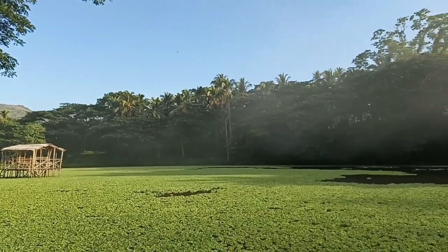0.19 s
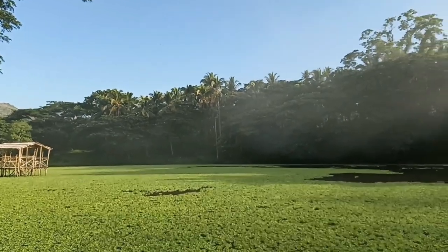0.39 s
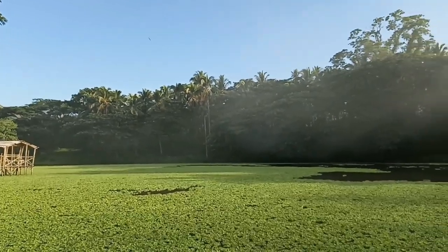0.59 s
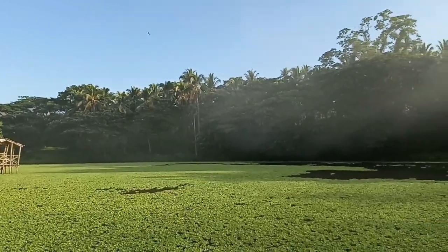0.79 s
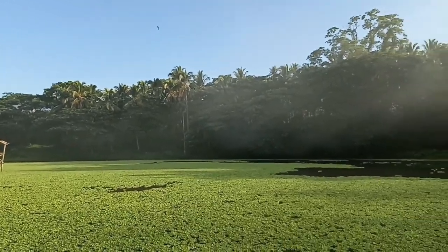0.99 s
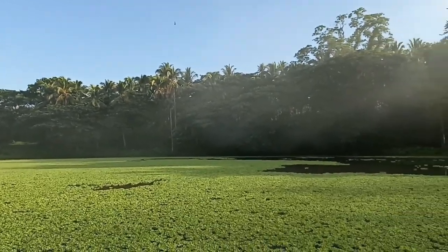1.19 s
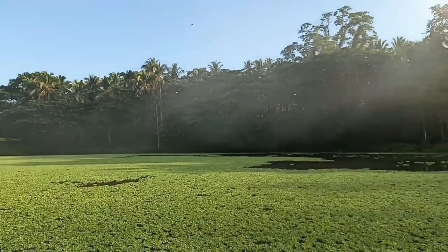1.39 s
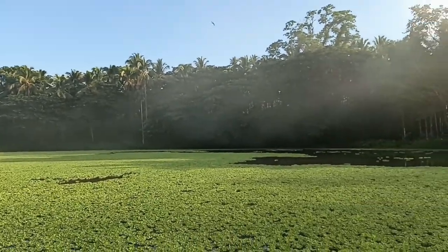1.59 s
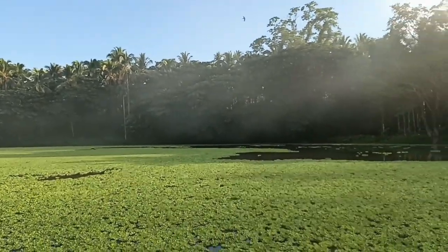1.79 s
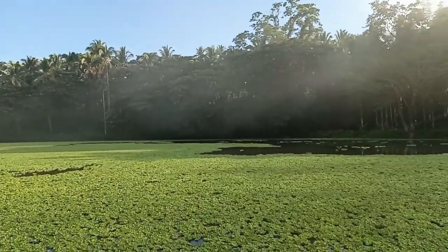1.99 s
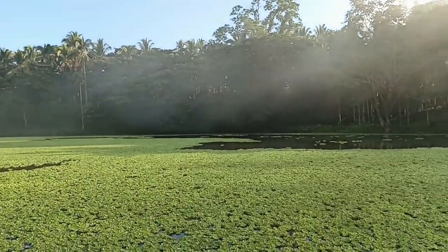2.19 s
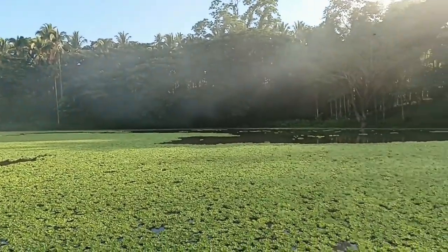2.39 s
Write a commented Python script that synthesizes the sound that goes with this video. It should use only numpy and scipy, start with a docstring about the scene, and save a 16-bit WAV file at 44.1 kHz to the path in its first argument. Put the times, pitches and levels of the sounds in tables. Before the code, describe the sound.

One sharp wooden knock echoes off trees across a pond while small birds chirp and whistle

```python
"""By a pond ringed with forest, in the morning: a few faint taps and one sharp wooden knock sound
across the water, and the trees throw the knock back. Knocks are bursts of noise plus ringing wood tones.
Small birds whistle, chirp and tick near and far, and a distant chicken calls: gliding tones with echoes.
Insects hiss, buzz and trill, made from narrow noise and a wavering tone, over shaped noise
for the far hiss, a wash and a low, uneven rumble of air."""
import sys
import numpy as np
from scipy import signal
from scipy.fft import rfft, irfft
from scipy.io import wavfile
from scipy.ndimage import uniform_filter1d, map_coordinates

SR = 44100
rng = np.random.default_rng(int(sys.argv[2]) if len(sys.argv) > 2 else 0)


def dump_mix(stems):
    """Bounce the given channels to the path in sys.argv[1] as a 16-bit WAV at rate SR."""
    frames = np.atleast_2d(stems).T  # one column per channel
    limited = np.clip(frames, -1, 1)  # hard clip at full scale
    pcm = np.round(limited * 32767).astype(np.int16)
    wavfile.write(sys.argv[1], SR, pcm)


N = 105840  # length of the scene in samples


def amp(db):
    """Turns decibels into a gain."""
    return 10 ** (np.asarray(db) / 20)


def evened(x):
    """Scales a sound to an average (rms) strength of one."""
    return x / np.sqrt(np.mean(x ** 2) + 1e-20)


def read(points, hz):
    """Reads a table between its points, with pitch on a logarithmic scale."""
    table_hz, value = np.transpose(points)
    return np.interp(np.log(hz + 1), np.log(table_hz + 1), value)


def level(points):
    """Gain at every sample, from a table of (time [s], level [dB])."""
    times, db = np.transpose(points)
    return amp(np.interp(np.arange(N) / SR, times, db))


def add(mix, s, sound):
    """Mixes a sound in, starting at time s in seconds."""
    part = mix[max(round(s * SR), 0):][:len(sound)]
    part += sound[:len(part)]


def noise(colour):
    """Steady noise whose balance of low and high follows a table."""
    spectrum = rfft(rng.standard_normal(N))
    gain = amp(read(colour, np.fft.rfftfreq(N, 1 / SR)))
    return evened(irfft(spectrum * gain, N))


def band(hz, width_hz):
    """Noise gathered in a narrow bell around one pitch."""
    f = np.fft.rfftfreq(N, 1 / SR)
    bell = np.exp(-.5 * ((f - hz) / width_hz) ** 2)
    return evened(irfft(rfft(rng.standard_normal(N)) * bell, N))


def drift(size, rate_hz):
    """A smooth random wander of about unit size, from curves through random points."""
    knots = rng.standard_normal(256)
    place = np.arange(size) * rate_hz / SR
    return map_coordinates(knots, [place], order=3, mode="mirror")


def scatter(x, t60, rise_s):
    """Echoes scattered by trunks and leaves: random reflections that fade by 60 dB in t60 seconds."""
    t = np.arange(SR) / SR
    taps = rng.standard_normal(SR) * (rng.random(SR) < 1500 / SR)  # about 1500 echoes per second
    tail = taps * (1 - np.exp(-t / rise_s)) * amp(-60 * t / t60)
    return signal.fftconvolve(x, tail / np.linalg.norm(tail))[:N]


NOTE_EDGE, WAVER, WAVER_HZ = 0.14, 0.0045, 79.4  # share of length, share of pitch, wander rate
FLUTTER_DB, FLUTTER_HZ = 2.8, 71  # most the loudness strays either way, wander rate


def note(length, pitches, overtone_db=-45, bend=0):
    """A nearly pure tone gliding through three pitches, wavering slightly in pitch and loudness."""
    u = np.linspace(0, 1, round(length * SR))
    glide = np.polyval(np.polyfit([0, .5, 1], pitches, 2), u)
    hz = glide * (1 + bend + WAVER * drift(len(u), WAVER_HZ))
    turn = 2 * np.pi * np.cumsum(hz) / SR
    edge = np.clip(np.minimum(u, 1 - u) / NOTE_EDGE, 0, 1)
    shape = np.sin(np.pi / 2 * edge) ** 2
    flutter = amp(FLUTTER_DB * np.tanh(drift(len(u), FLUTTER_HZ)))
    tone = np.sin(turn) + amp(overtone_db) * np.sin(2 * turn)
    return np.sqrt(2) * shape * flutter * tone


# colour of the far hiss: (pitch [Hz], relative level per Hz [dB])
AIR_COLOUR = [(100, -13), (200, -4), (400, -12), (800, -11), (1150, -30.5), (1400, -13.5), (1700, 1),
              (2100, -1), (2600, 1.5), (3200, -8), (4000, -19), (4900, -5.5), (5500, -21), (6400, -19.5),
              (9000, -21), (11000, -30.5), (15500, -33)]
AIR_DB = -65


def hiss():
    """The far hiss of the countryside: steady shaped noise."""
    return amp(AIR_DB) * noise(AIR_COLOUR)


# loudness of the mid-range wash as it swells and sinks: (time [s], level [dB])
WASH_LEVEL = [(0, -62.5), (0.12, -58.5), (0.3, -56.5), (0.5, -58), (0.7, -72), (0.9, -67), (2.4, -69)]
# colour of the wash: (pitch [Hz], relative level per Hz [dB])
WASH_COLOUR = [(150, -23.5), (400, -9), (800, -21.5), (1200, -2.5), (2000, -4.5), (3800, 3.5), (5200, -23),
               (9000, -47.5)]


def wash():
    """A mid-range wash: shaped noise that mostly dies away."""
    return level(WASH_LEVEL) * noise(WASH_COLOUR)


# uneven loudness of the rumble: (time [s], level [dB])
RUMBLE_LEVEL = [(0.0, -57.5), (0.13, -84.5), (0.35, -57.5), (0.39, -69), (0.51, -60.5), (0.56, -87),
                (0.61, -68), (0.85, -76), (1.15, -71), (1.18, -80), (1.54, -71), (1.64, -83.5),
                (1.76, -67.5), (1.82, -80.5), (2.0, -74.5), (2.03, -84), (2.18, -69), (2.4, -77)]
# colour of the rumble: (pitch [Hz], relative level per Hz [dB])
RUMBLE_COLOUR = [(20, -35), (45, -13.5), (80, -3), (115, 0.5), (160, -5.5), (230, -16.5), (400, -42.5),
                 (900, -48.5)]


def rumble():
    """A lumpy low rumble of air: deep noise whose level keeps rising and dipping."""
    return level(RUMBLE_LEVEL) * noise(RUMBLE_COLOUR)


# how strongly the far din flickers: (pitch [Hz], share of full flicker [0 to about 1])
FLICKER_SHARE = [(200, .3), (500, .9), (1500, 1), (3500, .9), (5000, .6), (7000, .3), (11000, .1)]
PATCH_DB, PATCH_S, PATCH_HZ = 3.2, .07, 170  # flicker strength; smoothing in time and pitch


def patchy(x):
    """Brief, narrow swells and gaps, as in a din of many far voices."""
    hz, at, z = signal.stft(x, SR, nperseg=1024, noverlap=768)
    field = rng.standard_normal(z.shape)
    for _ in range(2):
        field = uniform_filter1d(field, round(PATCH_S / at[1]), axis=1)
        field = uniform_filter1d(field, round(PATCH_HZ / hz[1]), axis=0)
    flicker_db = PATCH_DB * evened(field) * read(FLICKER_SHARE, hz)[:, None]
    return signal.istft(z * amp(flicker_db), SR, nperseg=1024, noverlap=768)[1][:N]


def air():
    """A flickering hiss and wash, with the rumble beneath."""
    return patchy(hiss() + wash()) + rumble()


# colour of the shimmer of many far insects: (pitch [Hz], relative level per Hz [dB])
SHIMMER_COLOUR = [(5500, -58), (6600, -20), (7000, 11), (7300, 6.5), (7800, 7), (8200, -2), (8600, 8.5),
                  (8900, -1.5), (9300, 0), (10150, -1), (10600, -11), (11500, -43)]
SHIMMER_DB = -73.5


def shimmer():
    """Many far insects blended into a wide band of high noise."""
    return amp(SHIMMER_DB) * noise(SHIMMER_COLOUR)


# loudness of the insect buzz: (time [s], level [dB])
BUZZ_LEVEL = [(0, -80), (1.3, -77.5), (1.75, -73.5), (2.4, -73.5)]
BUZZ_HZ, BUZZ_WIDTH_HZ, BUZZ_PER_S = 7290, 140, 73  # pitch, spread, average pulses per second


def buzz():
    """A lasting buzz: narrow noise that pulses at a slightly uneven rate."""
    rate = BUZZ_PER_S * (1 + .05 * drift(N, 20))
    beat = 1 + .7 * np.sin(2 * np.pi * np.cumsum(rate) / SR)
    return level(BUZZ_LEVEL) * evened(band(BUZZ_HZ, BUZZ_WIDTH_HZ) * beat)


# insect trills: (time [s], length [s], peak level [dB])
TRILLS = [(0.0, 0.27, -76.5), (1.846, 0.35, -68)]
TRILL_HZ, TRILL_PER_S, TRILL_WIDTH_HZ = 9250, 67.9, 45  # pitch, pulses per second, pitch wander


def trills():
    """High trills: a wandering tone opened and closed by rapid wing beats."""
    out = np.zeros(N)
    for s, length, db in TRILLS:
        size = round(length * SR)
        wings = np.sin(np.pi * TRILL_PER_S * np.arange(size) / SR) ** 2
        hz = TRILL_HZ + TRILL_WIDTH_HZ * drift(size, 300)
        tone = np.sin(2 * np.pi * np.cumsum(hz) / SR)
        add(out, s, amp(db) * wings * signal.windows.tukey(size, .2) * tone)
    return out


def insects():
    """A wide shimmer, a pulsing buzz and higher, fast trills."""
    return shimmer() + buzz() + trills()


FOREST_T60_S, FOREST_RISE_S = 1, 0.004  # time to fade by 60 dB, time to build up
CHORUS_PER_S, CHORUS_HZ, CHORUS_DB = 24, (1550, 3545), -73  # notes per second, pitch range, level


def chorus():
    """Many far birds: short notes at random times, heard mostly through their echoes."""
    out = np.zeros(N)
    low, high = CHORUS_HZ
    for when, pitch, glide, span, size in rng.random((round(CHORUS_PER_S * N / SR), 5)):
        hz = low * (high / low) ** pitch
        slope = 0.208 * (glide - .5)  # may rise or fall
        chirp = note(0.0138 + 0.0514 * span, (hz * (1 - slope), hz, hz * (1 + slope)))
        add(out, when * N / SR, amp(-12 * size) * chirp)
    return amp(CHORUS_DB) * evened(.5 * out + scatter(out, FOREST_T60_S, FOREST_RISE_S))


# colour of a knock: (pitch [Hz], relative level per Hz [dB])
KNOCK_COLOUR = [(120, -46), (280, -22), (400, -5.5), (520, -15), (800, -12), (1060, -5.5), (1250, -9.5),
                (1750, -1.5), (2200, -2), (2600, -9), (3100, -5), (3800, -11.5), (4400, -22.5),
                (5000, -29.5), (5800, -37.5), (9000, -45), (11000, -50), (15500, -62)]
CRACK_T60_S, CRACK_LOW_HZ = 0.12, 650  # time to fade by 60 dB; the crack has no bass below this


def crack(sharp_db):
    """The sharp start of a knock: close reflections as a burst of noise without bass."""
    t = np.arange(N) / SR
    thin = signal.butter(3, CRACK_LOW_HZ, "high", fs=SR, output="sos")
    burst = signal.sosfilt(thin, noise(KNOCK_COLOUR))
    return burst * amp(sharp_db - 60 * t / CRACK_T60_S) * np.minimum(t / 0.00072, 1)


# how long each part of the knock's tail lasts: (pitch [Hz], time to fade by 60 dB [s])
KNOCK_T60 = [(300, 0.15), (900, .28), (2200, 0.28), (4000, 0.12), (6000, 0.22), (12000, 0.086)]
BLOOM_CYCLES = 4.5  # build-up in cycles, so low tones build up more slowly
KNOCK_TAIL_DB, TAIL_RISE_S, GRAIN_DB, GRAIN_PER_S = -1.5, 0.011, 2.5, 450


def knock_tail():
    """The grainy tail of a knock: noise whose bass builds late and whose treble mostly fades sooner."""
    t = np.arange(N) / SR
    hz, at, z = signal.stft(noise(KNOCK_COLOUR), SR, nperseg=256)
    bloom = 1 - np.exp(-np.outer(hz, at) / BLOOM_CYCLES)
    fade = amp(-60 * at / read(KNOCK_T60, hz)[:, None])
    tail = signal.istft(z * bloom * fade, SR, nperseg=256)[1][:N]
    grain = amp(KNOCK_TAIL_DB + GRAIN_DB * drift(N, GRAIN_PER_S))
    return grain * tail * (1 - np.exp(-t / TAIL_RISE_S))


# tones of the struck wood: (pitch [Hz], relative level [dB], time to fade by 60 dB [s])
WOOD = [(389, -15.5, 0.34), (426.8, -14.5, 0.27), (524.3, -16.5, 0.28), (674, -13, 0.27), (874, -18, .2),
        (1029, -11, 0.32), (1091, -0.5, 0.091), (1755, -15, 0.11), (1745, -14, 0.19), (2330, 1, 0.083)]


def wood_ring():
    """The struck wood ringing: a set of tones that each build up and die away."""
    t = np.arange(SR // 2) / SR
    ring = np.zeros(len(t))
    for hz, db, t60 in WOOD:
        shape = amp(db - 60 * t / t60) * np.minimum(t * hz / BLOOM_CYCLES, 1)
        ring += shape * np.sin(2 * np.pi * (hz * t + rng.random()))
    return ring


# taps, the knock and its echo: (time [s], level [dB], crack level relative to that [dB])
KNOCKS = [(0.001, -48, -1.5), (0.072, -77, 15), (0.134, -44, -31), (0.2063, -29.5, 0), (0.2481, -32.5, -5)]
RING_DB = -6


def knocks():
    """Each knock joins a crack, a grainy tail and the ringing of the wood."""
    out = np.zeros(N)
    for s, db, sharp_db in KNOCKS:
        add(out, s, amp(db) * (crack(sharp_db) + knock_tail()))
        add(out, s, amp(db + RING_DB) * wood_ring())
    return out


# far chicken calls: (time [s], length [s], start [Hz], middle [Hz], end [Hz], level [dB])
CLUCKS = [(0.09, 0.13, 743, 718, 690, -72.5), (0.443, 0.1, 522, 534, 534, -80.5),
          (0.592, 0.039, 687, 740, 800, -72.5), (0.6, 0.075, 503, 511.5, 535, -77),
          (0.699, 0.038, 750, 736, 735, -74.5), (0.832, .07, 430, 423, 412, -77),
          (1.382, 0.054, 710, 679.5, 673, -73), (1.444, 0.028, 683, 736, 776, -69),
          (1.898, 0.047, 733, 724.6, 702, -64.5), (1.939, .07, 699, 696.6, 694, -62)]
CLUCK_OVERTONE_DB, CLUCK_ROUGH_DB, CLUCK_ECHO_DB = -20, 3.5, -11


def clucks():
    """A chicken's hoarse, nearly level calls: tones with an overtone and a rough, quivering loudness."""
    calls = []
    for s, length, start, middle, end, db in CLUCKS:
        tone = note(length, (start, middle, end), CLUCK_OVERTONE_DB)
        hoarse = evened(tone * amp(CLUCK_ROUGH_DB * drift(len(tone), 129)))
        calls.append((s, amp(db) * hoarse, CLUCK_ECHO_DB))
    return calls


# clear bird notes: (time [s], length [s], start [Hz], middle [Hz], end [Hz],
# level at mid-note [dB], level change over the note [dB], sound sent to the echoes [dB])
NOTES = [(0.092, 0.048, 3454, 3514, 3500, -65, -1, -8), (0.353, 0.21, 2908, 3078, 3327, -56, -5, -8),
         (0.411, 0.27, 3754, 3618, 3650, -58.5, -20.5, -13),
         (0.809, 0.063, 8180, 7740, 7670, -73.5, -8, -3), (0.986, .19, 1920, 1737, 1586, -59, 4, -3),
         (1.152, .036, 1750, 1952, 2245, -64, 7, 10), (1.178, 0.026, 2230, 2475, 2280, -55, 9, -2),
         (1.202, 0.017, 2400, 2290, 2130, -50.5, -5, -9), (1.223, 0.059, 3096, 3084, 2977, -60.5, -3, -11),
         (1.368, .022, 1740, 1615, 1380, -58.5, -2, 0), (1.426, 0.081, 1701, 1757, 1650, -65, -13, -0.5),
         (1.482, 0.053, 2945, 2950, 2860, -67.5, -9, -10), (1.548, .01, 2050, 2224, 2340, -55, -16, 2.5),
         (1.5555, .026, 2820, 2915, 2750, -42, 3, -10), (1.574, 0.026, 2723, 2735, 2520, -57, 4, 2),
         (1.672, 0.062, 3260, 3800, 3940, -65, -9, -6.5), (1.675, 0.0467, 3770, 4047, 4140, -63.5, 5, -4),
         (1.776, 0.13, 2808, 3174, 3178, -59, 7, -2.5), (1.896, 0.041, 1857, 1710, 1480, -57.5, -10.5, -21),
         (1.947, 0.03, 2036, 2278, 2480, -69, 5, 4.5), (1.986, 0.03, 4320, 3620, 3120, -60.5, -6, -0.5),
         (2.028, 0.064, 3505, 3924, 4040, -62, -1, -9), (2.034, 0.049, 3878, 4090, 4140, -62.5, 10, -5),
         (2.207, .075, 3540, 3620, 3610, -65.5, 14, -7), (2.283, 0.05, 3620, 3480, 3200, -61, 17, 0.5)]


def whistles():
    """Clear whistles and chirps: gliding tones that grow or fade as they go."""
    calls = []
    for s, length, start, middle, end, db, change_db, echo_db in NOTES:
        tone = note(length, (start, middle, end))
        gain = amp(db + change_db * np.linspace(-.5, .5, len(tone)))
        calls.append((s, tone * gain, echo_db))
    return calls


# soft falling pips: (time [s], level [dB])
PIPS = [(0.411, -58.5), (0.499, -61.5), (0.664, -59), (0.749, -61), (0.899, -66), (0.983, -60)]
PIP_S, PIP_HZ, PIP_ECHO_DB = 0.0182, (2190, 2060, 2020), -11.5


def pips():
    """Soft pips: very short tones that fall in pitch."""
    return [(s, amp(db) * note(PIP_S, PIP_HZ), PIP_ECHO_DB) for s, db in PIPS]


# a bird's high falling ticks, by group of three: (time [s], level [dB])
TICK_GROUPS = [(0.52, -69.5), (0.765, -69), (1.005, -68.5), (1.248, -68)]
TICK_GAP_S, TICK_S, TICK_HZ, TICK_ECHO_DB = .0342, 0.019, (4760, 4476, 4340), -22


def ticks():
    """High ticks in threes: short tones that fall in pitch."""
    calls = []
    for s, db in TICK_GROUPS:
        for k in range(3):
            calls.append((s + k * TICK_GAP_S, amp(db) * note(TICK_S, TICK_HZ), TICK_ECHO_DB))
    return calls


# one rattling churr: (time [s], length [s])
CHURR = (1.714, .086)
CHURR_HZ, CHURR_DB, CHURR_ECHO_DB = (2450, 2380, 2050), -49.5, 1
CHURR_PER_S, CHURR_JITTER, CHURR_SWEEP = 100, .25, .2  # chirps per second, share of rate, share of pitch


def churr():
    """A fast train of tiny downward chirps that swells and fades."""
    s, length = CHURR
    u = np.linspace(0, 1, round(length * SR))
    rate = CHURR_PER_S * (1 + CHURR_JITTER * drift(len(u), 100))
    cycle = (np.cumsum(rate) / SR) % 1
    tone = note(length, CHURR_HZ, bend=CHURR_SWEEP * (1 - 2 * cycle))
    swell = abs(np.sin(np.pi * u ** 0.47)) ** 0.88
    return [(s, amp(CHURR_DB) * tone * np.sin(np.pi * cycle) ** 2 * swell, CHURR_ECHO_DB)]


LEAVES_T60_S, LEAVES_RISE_S, LEAVES_DB = .13, 0.004, -1  # the short echo
FOREST_DB = 1  # the long echo


def birds():
    """All the single calls, each heard directly and through a short and a long forest echo."""
    direct, sent = np.zeros(N), np.zeros(N)
    for s, sound, echo_db in clucks() + whistles() + pips() + ticks() + churr():
        add(direct, s, sound)
        add(sent, s, sound * amp(echo_db))
    leaves = amp(LEAVES_DB) * scatter(sent, LEAVES_T60_S, LEAVES_RISE_S)
    forest = amp(FOREST_DB) * scatter(sent, FOREST_T60_S, FOREST_RISE_S)
    return direct + leaves + forest


def scene():
    """Everything heard from the bank, as one channel."""
    return (air() + insects() + chorus() + knocks() + birds())[None]


EDGE_HZ = 15700


def record(dry):
    """Cuts away the highest treble with a steep low-pass filter."""
    low_pass = signal.firwin(511, EDGE_HZ, window=("kaiser", 9), fs=SR)
    return signal.oaconvolve(dry, low_pass[None], "same")


dry = scene()
out = record(dry)
dump_mix(out)
```